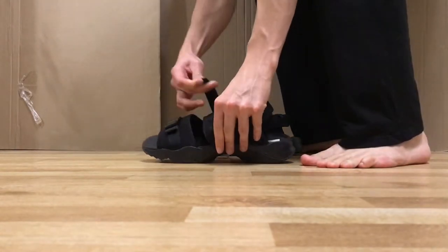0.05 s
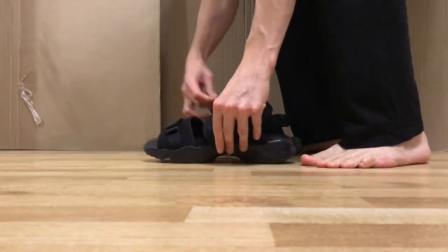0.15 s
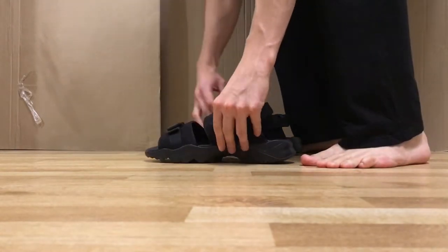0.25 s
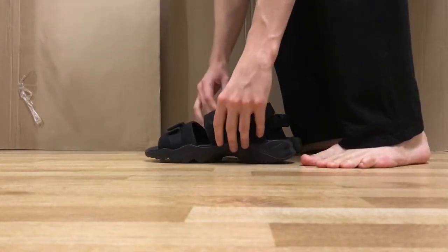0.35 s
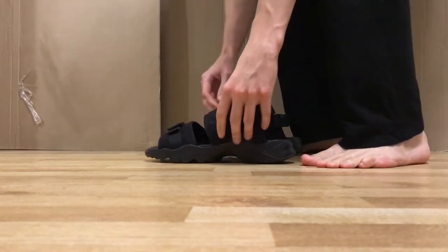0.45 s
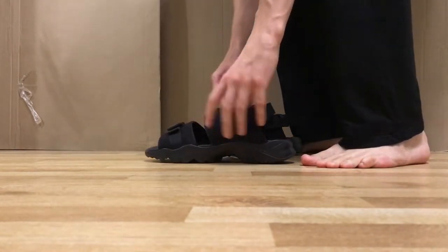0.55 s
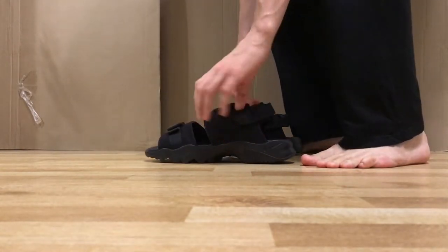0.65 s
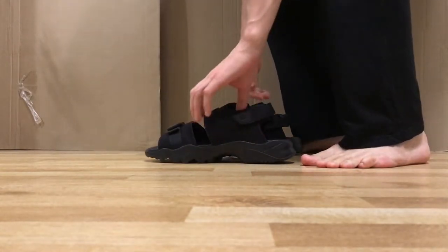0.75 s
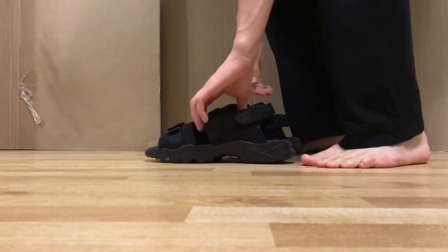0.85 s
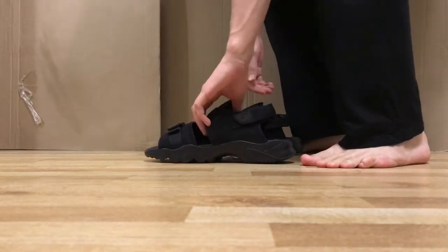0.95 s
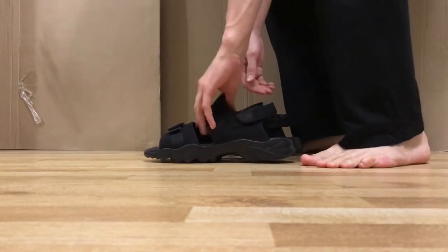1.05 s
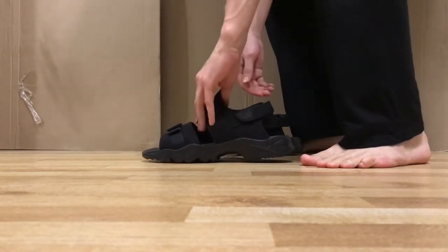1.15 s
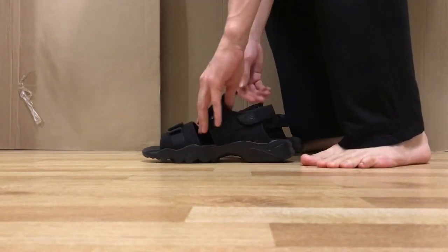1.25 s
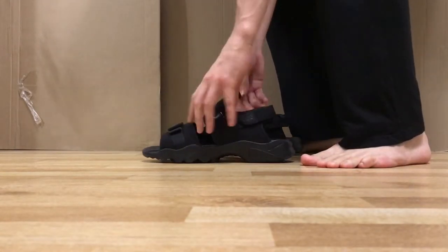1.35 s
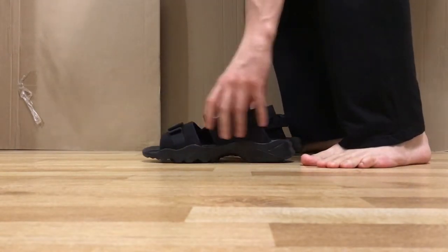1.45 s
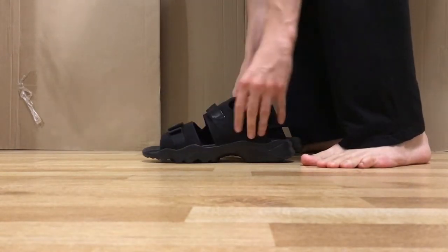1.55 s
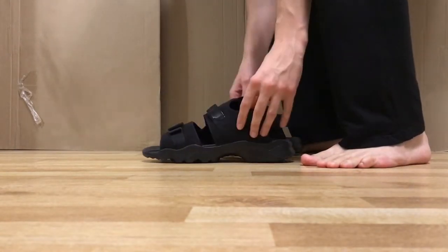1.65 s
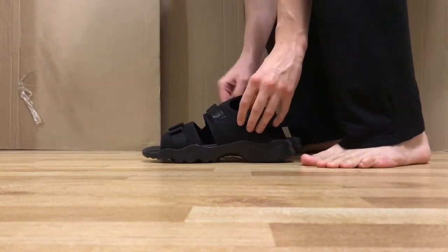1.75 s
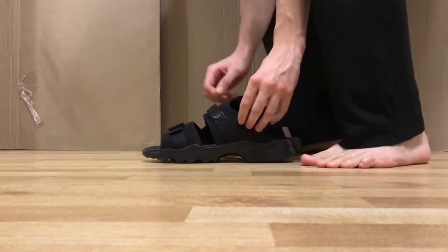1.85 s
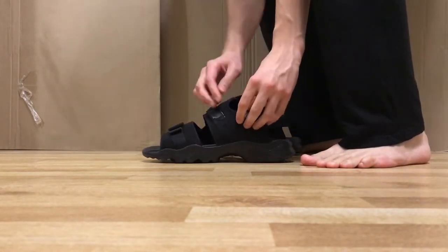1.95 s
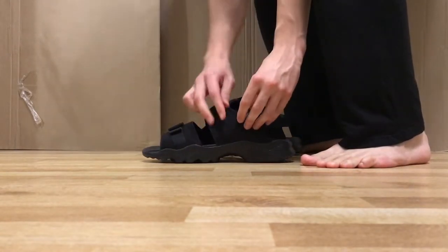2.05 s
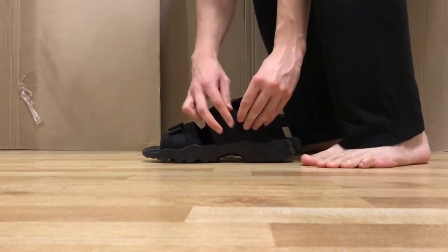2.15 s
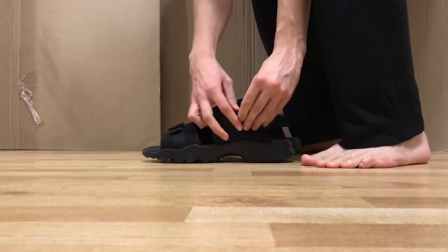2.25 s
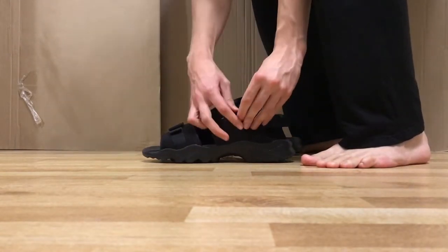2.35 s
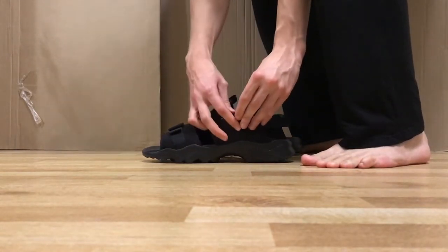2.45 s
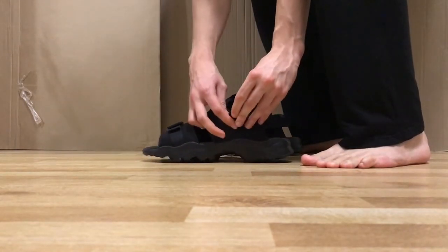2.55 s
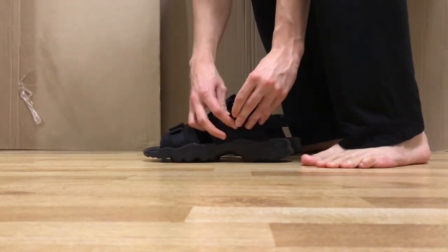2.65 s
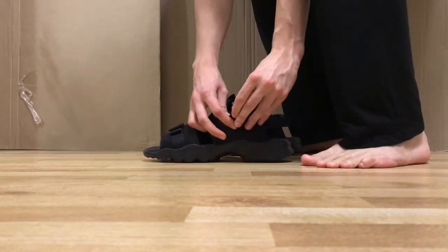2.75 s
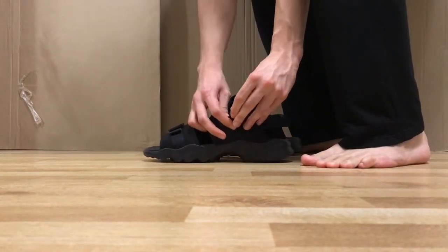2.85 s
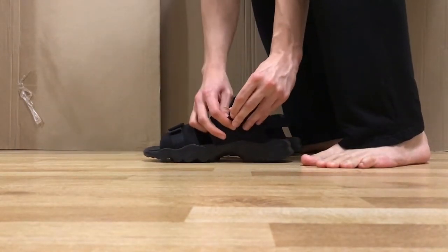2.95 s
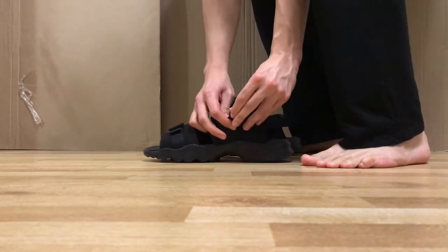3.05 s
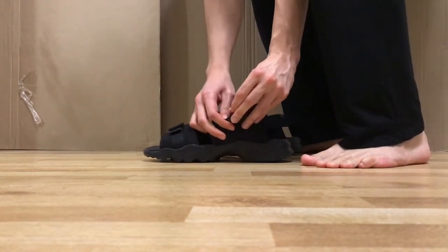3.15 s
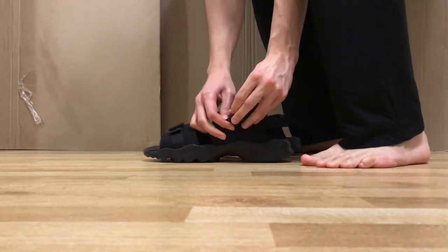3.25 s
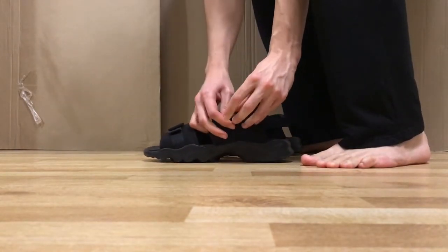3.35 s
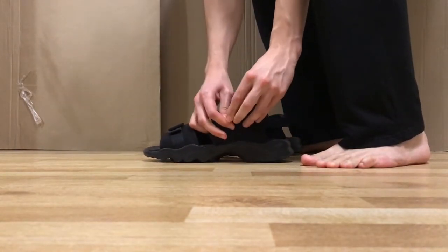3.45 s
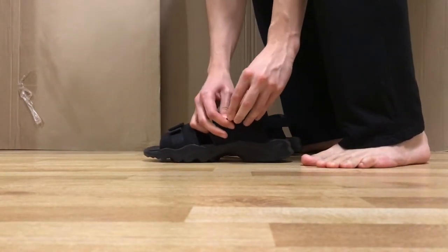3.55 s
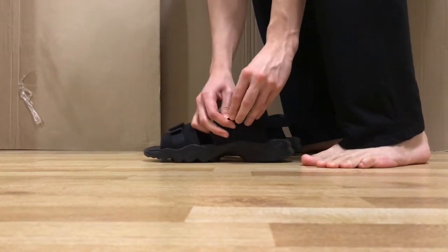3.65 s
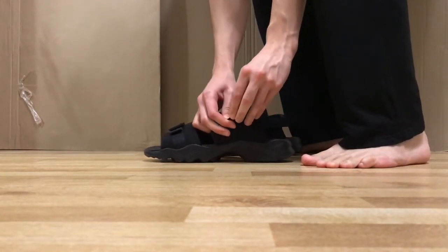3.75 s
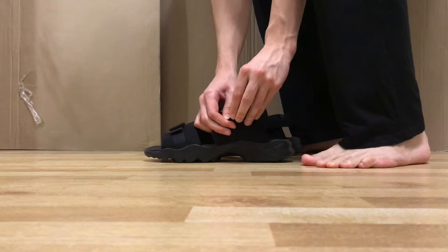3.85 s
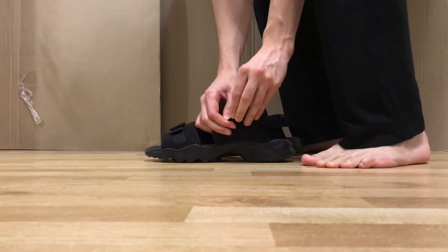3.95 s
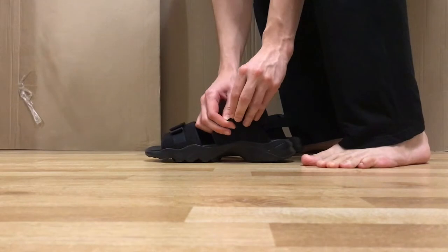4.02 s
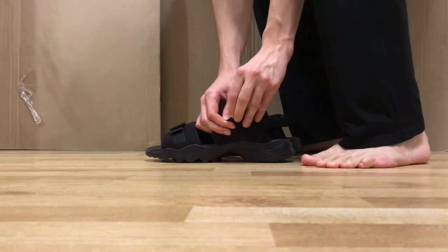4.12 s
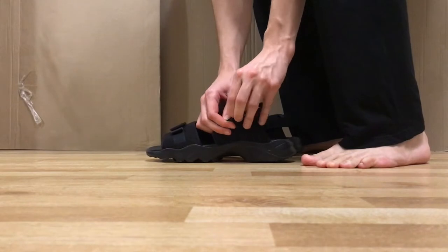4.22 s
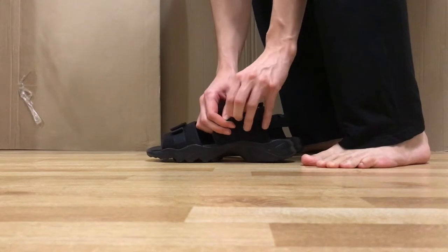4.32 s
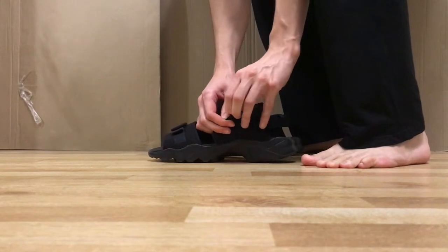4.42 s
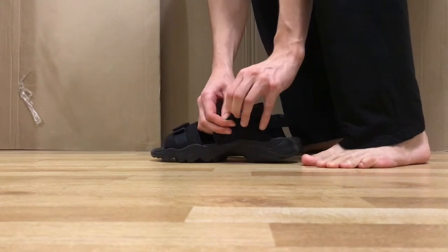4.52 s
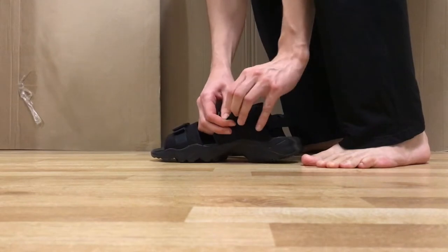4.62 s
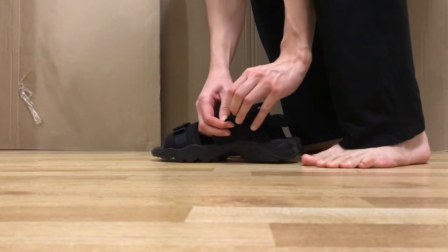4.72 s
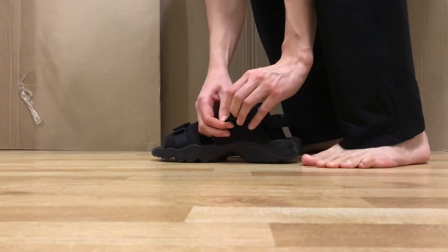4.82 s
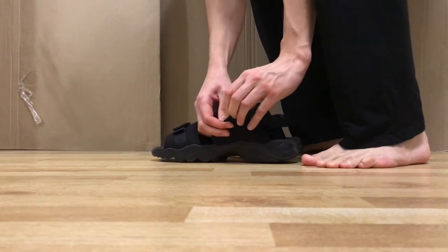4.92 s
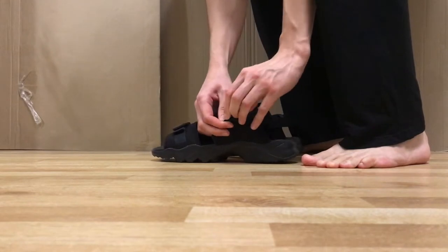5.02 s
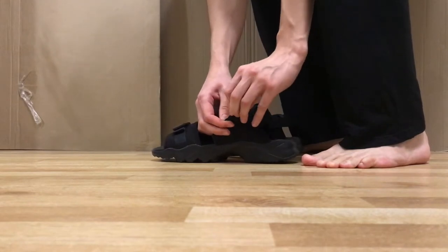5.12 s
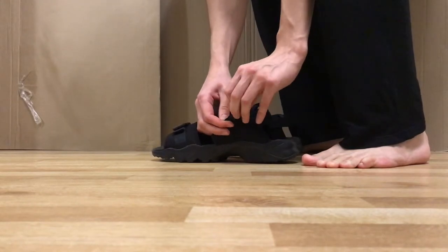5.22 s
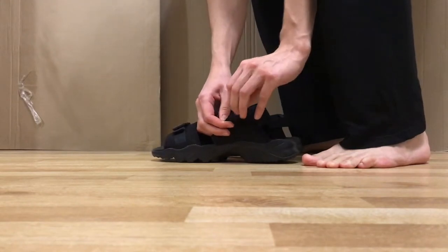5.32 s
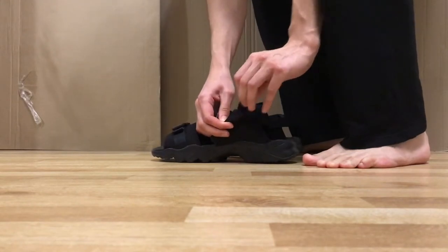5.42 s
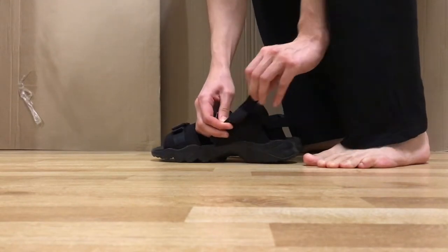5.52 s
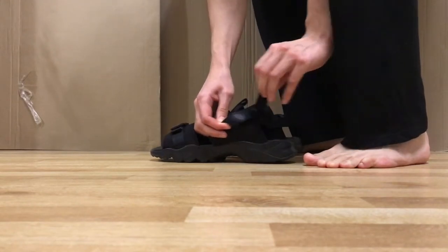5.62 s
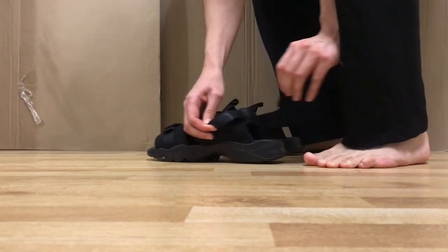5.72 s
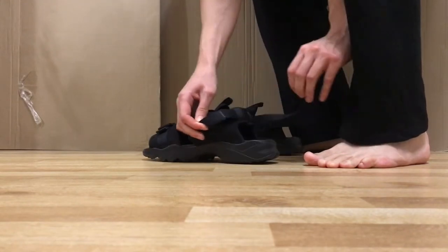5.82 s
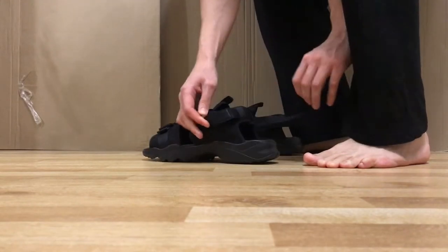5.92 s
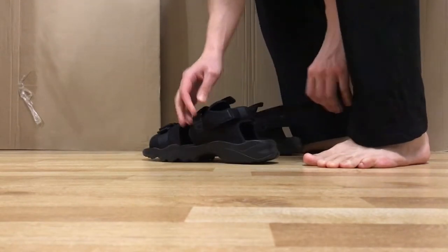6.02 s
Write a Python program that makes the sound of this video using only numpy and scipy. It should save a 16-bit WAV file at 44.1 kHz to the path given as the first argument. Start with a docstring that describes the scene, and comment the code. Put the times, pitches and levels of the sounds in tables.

```python
"""Hands work a sandal's hook-and-loop strap on a wooden floor in a small quiet room, over air and a faint hum.
From the start, filtered grains make fingers rub and brush the fabric; damped modes make nudges and knocks.
Small tufts of hooks snap as the tab is picked loose: whitened noise volleys through a short ring, plus recoil.
Later come three short tugs and the surges of the rip: runs of small snaps over a rasp of dense clicks;
a last rub and two faint knocks follow."""
import sys
import numpy as np
from scipy import signal
from scipy.fft import rfft, irfft
from scipy.io import wavfile

SR = 44100
rng = np.random.default_rng(int(sys.argv[2]) if len(sys.argv) > 2 else 0)


def generate_wav(signal):
    """Clip the signal to [-1, 1] and save it as 16-bit WAV at the path in sys.argv[1]."""
    frames = np.transpose(np.atleast_2d(signal))
    scaled = np.clip(frames, -1, 1) * 32767
    pcm = np.round(scaled).astype(np.int16)
    wavfile.write(sys.argv[1], SR, pcm)


N = 268128
TIME = np.arange(N) / SR   # seconds
CUTOFF_HZ = 15900   # top of the treble

# spectrum of the still room air: hz, relative level_db
AIR_SPECTRUM = [(15, -60), (25, -8.5), (80, 1.5), (175, -4), (317, -2), (451, -14.5), (575, -9.5),
                (734, -14), (1020, -12.5), (1700, -21), (4870, -27.5), (5730, -26.5), (7510, -31),
                (12500, -30), (16000, -36)]
AIR_DB = -59.5   # rms
# wavering hum lines: pitch_hz, rms level_db before the waver
HUM_LINES = [(102.3, -74.5), (258.4, -70.5), (317.6, -68)]
# strokes of the hands on the sandal, plus a short burst of rub and brush that thickens the snap at 3.17 s: #
# middle_s, length_s, soft rub_db, dry brush_db (both before the trims in scene)
HAND_STROKES = [(0, 0.11, -47, -51.5), (0.205, 0.076, -52.5, -62.5), (0.248, 0.016, -40.5, -47),
                (0.291, 0.007, -31, -41.5), (0.94, 0.25, -62, -86), (1.141, 0.11, -55, -70.5),
                (1.294, 0.057, -57, -62.5), (1.61, 0.16, -63, -73), (1.774, 0.07, -53, -60),
                (1.897, 0.062, -52.5, -62.5), (2.255, 0.03, -56, -68), (2.442, 0.16, -60.5, -67.5),
                (2.551, 0.027, -52, -58.5), (2.63, 0.086, -62, -86), (2.928, 0.029, -56.5, -85),
                (3.172, 0.0081, -36.5, -37), (3.943, 0.52, -75, -74),   (4.959, 0.026, -58.5, -66),
                (5.28, 0.045, -64, -66), (5.72, 0.54, -58, -67.5)]
# tone of skin rubbing on padding: hz, relative level_db
RUB_SPECTRUM = [(200, -14.5), (450, -8), (700, -1), (1050, 4), (1700, -9), (2800, -10.5), (5000, -27.5),
                (9000, -25), (16000, -53)]
# tone of webbing brushing on webbing: hz, relative level_db
BRUSH_SPECTRUM = [(800, -54.5), (2500, 10.5), (4000, 2.5), (7000, 1.5), (10000, -7.5), (13000, -6),
                  (16000, -13.5)]
# blows on the sandal: start_s, level_db, contact brightness_hz, sole thud_db relative to the blow,
# stiffness of the spot as a pitch ratio for the upper
SANDAL_KNOCKS = [(.241, -11.5, 1100, 1.5, 0.72), (0.2511, -15.5, 1280, -5.5, 0.82),
                 (0.2921, 0, 1460, -34, 0.93), (.364, -18, 700, -20, 1.1), (1.2543, -10.5, 603, -4.5, 1.15),
                 (1.304, -24, 604, 5, 1.06), (1.375, -29.5, 600, -2, 1.5), (1.5755, -25, 980, -4, 1.19),
                 (2.547, -20.5, 2160, -30, 1.45), (3.1712, -11, 4570, -20, 1.97),
                 (3.172, -13.5, 4000, -7.5, 1.17), (4.649, -20.5, 700, -19, 1.08),
                 (4.686, -13, 700, -15, 0.86), (5.1315, -19, 900, -11, 1.15), (5.484, -19, 880, -1.5, 1.13),
                 (5.876, -28, 1020, -2, 0.97), (6.028, -32.5, 700, -2, 1.3)]
# resonances of the sandal's upper and buckle, before each blow's scatter: pitch_hz, width_hz, level_db
UPPER_MODES = [(587, 275, -5.5), (868, 270, 3), (1610, 470, -1), (1940, 290, -8), (2850, 540, -2.5),
               (4200, 500, 2.5), (6360, 1200, -0.5)]
# resonances of the sole on the floor, before each blow's scatter: pitch_hz, width_hz, level_db
SOLE_MODES = [(69, 32, -23), (126, 47, 2), (181, 78, 0.5), (265, 40, 2.5), (340, 73, -1.5)]
# the clearest tufts of hooks letting go: start_s, level_db, tear_s (time the tuft takes to tear)
CLEAR_SNAPS = [(0.486, -36, .001), (0.7955, -38.5, 0.00088), (2.4181, -23.5, 0.00064), (2.8074, -39, .0007),
               (3.1355, -24.5, 0.00054), (3.152, -20, 0.00079), (3.1597, -22.5, 0.00046),
               (3.1706, -15.5, .0009), (3.9406, -22, 0.00025), (4.0869, -35.5, 0.00035),
               (4.1169, -11.5, 0.00037), (4.1649, -25, 0.00036), (4.1882, -22, 0.00028),
               (4.1928, -16, .0012), (4.2137, -21, 0.00045), (4.3131, -15, 0.00025),
               (4.3353, -17.5, 0.00018), (4.3723, -12, 0.00027), (4.4595, -13, 0.0014),
               (4.4759, -6.5, 0.0006), (4.5046, -12, 0.00074), (4.5861, -16.5, 0.00027),
               (4.5912, -9.5, 0.00029), (4.6135, -11, .0006), (4.6746, -2.5, 0.0015), (4.7135, -12, 0.0016),
               (5.1301, -12.5, 0.00043), (5.2986, -19, 0.00085), (5.3056, -6, 0.0013),
               (5.3177, -7.5, 0.00044), (5.3485, -0.5, 0.0017), (5.3933, -6.5, .0014),
               (5.4187, -2.5, .0014), (5.4223, 2.5, 0.0014), (5.4395, -1, 0.00036), (5.4628, 1.5, 0.00036),
               (5.4807, 3, 0.0016), (5.5217, -7, .0006), (5.5619, -6, 0.0012), (5.594, -17, .0003),
               (5.6213, -5.5, 0.0023)]
NEIGHBOUR_GAP_S, NEIGHBOUR_DB = 0.003, -9.5   # typical delay and relative level of a neighbour dragged loose
# the hooks ring higher the tauter the strap is held: time_s, ring_hz before scatter
STRAP_TAUTNESS = [(3.17, 2640), (4.2, 3900), (4.37, 4900), (4.5, 8750), (4.69, 9500), (4.75, 4200),
                  (5.13, 3720), (5.3, 10000), (5.355, 12000), (5.42, 6200), (5.463, 7400), (5.48, 4200)]
RING_SCATTER_OCTAVES = 0.18   # no two tufts ring alike
RECOIL_SHARE = 0.97   # share of a tuft's swing in dB that the strap's recoil follows
# tone of the hooks: hz, relative level_db
HOOK_SPECTRUM = [(300, -30.5), (900, -9), (1550, -7), (2100, -6), (3000, -2), (4700, -3), (6200, 0),
                 (8000, -3), (10500, -2.5), (13000, -5), (16000, -7.5)]
# tone of the strap body: hz, relative level_db
STRAP_SPECTRUM = [(150, -14.5), (280, -9.5), (420, -9.5), (650, 3), (1000, 5), (1550, -5.5), (2300, -17.5),
                  (6000, -74.5)]
# pulls that peel the strap, three short tugs and then the surges of the rip:
# start_s, length_s, rasp_db of single hooks, tuft_db before scatter
PEEL_PULLS = [(4.463, .024, -46.5, -15), (4.604, 0.023, -54, -15), (4.667, .057, -56, -13.5),
              (5.333, 0.052, -35.5, -9.5), (5.389, 0.033, -47, -13), (5.42, 0.048, -33, -5.5),
              (5.488, .053, -47, -17), (5.54, 0.0356, -38, -14.5), (5.577, .06, -45.5, -23)]
PULL_EDGE_S = 0.0023   # a pull takes hold and lets go this fast
TUFT_GAP_S = 0.007   # average spacing of the small tufts within a pull
TUFT_TEAR_S, TUFT_SCATTER_DB = 0.00044, 1   # typical tear time, and level spread either way
# length of the room's tail: hz, t60_s
ROOM_T60 = [(150, 0.54), (500, 0.4), (1400, 0.44), (4000, 0.45), (9000, 0.31), (15000, 0.41)]
# strength of the room's tail against the direct sound: hz, level_db
ROOM_LEVEL = [(100, 0.5), (400, -2), (1000, -7), (4000, -5.5), (9000, -8.5), (15000, -4.5)]
# first reflections: delay_s, level_db against the direct sound
FIRST_ECHOES = [(.0039, -12), (.0095, -15)]


def from_db(db):
    """Decibels to gain."""
    return 10 ** (np.asarray(db) / 20)


def rms_one(x):
    """Scale to rms 1."""
    return x / np.sqrt(np.mean(x ** 2) + 1e-20)


def energy_one(x):
    """Scale to total energy 1."""
    return x / np.sqrt(np.sum(x ** 2) + 1e-20)


def at_hz(points, hz):
    """Read a table on a log-frequency axis."""
    f, value = np.transpose(points)
    return np.interp(np.log(np.maximum(hz, 1)), np.log(f), value)


def add(track, s, sound):
    """Mix a sound in at time s."""
    start = max(round(s * SR), 0)
    track[start:start + len(sound)] += sound[:max(N - start, 0)]


def drift(rate):
    """Random wander through rate knots a second, each knot drawn with spread 1."""
    knots = rng.standard_normal(N // 20)
    return np.interp(TIME * rate, np.arange(len(knots)), knots)


def colour(x, spectrum, size=4096):
    """Causal (minimum-phase) filter of the given shape that keeps the power of white noise."""
    cepstrum = irfft(np.log(from_db(at_hz(spectrum, np.fft.rfftfreq(size, 1 / SR)))))
    # folding the cepstrum onto positive time makes the filter minimum-phase
    cepstrum[1:size // 2] *= 2
    cepstrum[size // 2 + 1:] = 0
    response = energy_one(irfft(np.exp(rfft(cepstrum))))
    return signal.fftconvolve(x, response)[:N]


def grains(per_s, spread_db):
    """Random clicks of random sign, sized by an exponential spread in dB; rms 1."""
    sizes = from_db(spread_db * np.minimum(rng.exponential(1, N), 4)) * rng.choice([-1, 1], N)
    return rms_one(sizes * (rng.random(N) < per_s / SR))


def background(waver):
    """Still room air, and a hum whose lines waver in level and phase."""
    air = from_db(AIR_DB) * rms_one(colour(rng.standard_normal(N), AIR_SPECTRUM))
    hum = np.zeros(N)
    for hz, db in HUM_LINES:
        swell = 1 + waver * drift(3.215)
        phase = 2 * np.pi * hz * TIME + 2 * waver * drift(7.5)
        hum += from_db(db) * np.sqrt(2) * swell * np.sin(phase)
    return air + hum


def handling(rub_db, brush_db):
    """Skin on padding gives a dull grainy rub, webbing on webbing a finer dry brush."""
    rub, brush = np.zeros(N), np.zeros(N)
    for middle, length, soft_db, dry_db in HAND_STROKES:
        pressure = np.exp(-(2 * (TIME - middle) / length) ** 2)
        rub += pressure * from_db(soft_db + rub_db)
        brush += pressure * from_db(dry_db + brush_db)
    rub_grains = colour(grains(500, spread_db=2), RUB_SPECTRUM)
    brush_grains = colour(grains(4000, spread_db=0.0), BRUSH_SPECTRUM)
    return rub * rub_grains + brush * brush_grains


def struck(modes, stiffness, scatter_db):
    """Damped modes, higher at a stiffer spot; each blow shares its energy among them a little differently."""
    t, out = TIME[:SR // 5], 0
    for k, (hz, width, db) in enumerate(modes):
        strength, detune = rng.standard_normal(2)
        mode_hz = hz * stiffness * (1 + 0.011 * detune)
        wave = np.sin(2 * np.pi * mode_hz * t) * np.exp(-np.pi * width * t)
        # neighbouring modes start in opposite directions
        out = out + (-1) ** k * from_db(db + scatter_db * strength) * energy_one(wave)
    return out


def knocks():
    """Soft contacts stir only the low modes of the upper; the sole passes the blow to the floor."""
    out = np.zeros(N)
    for s, db, bright_hz, thud_db, stiffness in SANDAL_KNOCKS:
        contact = signal.butter(2, min(bright_hz, .4 * SR), fs=SR, output="sos")
        upper = signal.sosfilt(contact, struck(UPPER_MODES, stiffness, scatter_db=-1.0))
        sole = struck(SOLE_MODES, 1.0, scatter_db=4.5)
        add(out, s, from_db(db) * energy_one(upper))
        add(out, s, from_db(db + thud_db) * energy_one(sole))
    return out


def whiten(x):
    """Keep the phases of a burst but give every frequency the same strength."""
    spectrum = rfft(x)
    return irfft(spectrum / (np.abs(spectrum) + 1e-12), len(x))


def tufts():
    """Clear snaps, their neighbours and an uneven run of small tufts in every pull: start_s, level_db, tear_s."""
    rows = list(CLEAR_SNAPS)
    for (s, db, _), gap in zip(CLEAR_SNAPS, rng.uniform(-1, 1, size=len(CLEAR_SNAPS))):
        rows.append((s + NEIGHBOUR_GAP_S * 2 ** gap, db + NEIGHBOUR_DB, TUFT_TEAR_S))
    for start, length, _, db in PEEL_PULLS:
        for k, (late, size, slow) in enumerate(rng.uniform(-1, 1, size=(12, 3))):
            after = TUFT_GAP_S * (k + .5 + .5 * late)
            if after < length:
                rows.append((start + after, db + TUFT_SCATTER_DB * size, TUFT_TEAR_S * 2 ** slow))
    return rows


def snaps(recoil_db, ring_width_hz, crack):
    """The hooks of a tuft break in a quick dying volley, ring briefly, and the freed strap springs back."""
    hooks, recoil, t = np.zeros(N), np.zeros(N), TIME[:SR // 40]
    r = np.exp(-np.pi * ring_width_hz / SR)   # pole radius of the ring
    chances = rng.standard_normal(size=(200, 2))
    breaks = rng.standard_normal(size=(200, len(t)))
    for (s, db, tear_s), (detune, swing), noise in zip(tufts(), chances, breaks):
        # the first hooks to go hand their load to the rest, so the volley swells before it dies
        age = t / tear_s
        volley = whiten(noise * np.sqrt(age) * np.exp(-age)) * np.exp(-(age / 4) ** 2)
        taut_hz = np.interp(s, *np.transpose(STRAP_TAUTNESS))
        ring_hz = min(taut_hz * 2 ** (RING_SCATTER_OCTAVES * detune), CUTOFF_HZ)
        feed = [(1 - r * r) / 2, 0, (r * r - 1) / 2]
        resonance = [1, -2 * r * np.cos(2 * np.pi * ring_hz / SR), r * r]
        ringing = signal.lfilter(feed, resonance, volley)
        add(hooks, s, from_db(db) * energy_one(ringing + crack * volley))
        # a one-sample kick of random direction
        add(recoil, s, from_db(RECOIL_SHARE * db + recoil_db) * np.sign([swing]))
    return colour(hooks, HOOK_SPECTRUM) + colour(recoil, STRAP_SPECTRUM)


def peeling(hooks_per_s, catch_db, strap_db):
    """Along the peel line single hooks give way in a dense stream, catching and slipping unevenly."""
    pull = np.zeros(N)
    for start, length, rasp_db, _ in PEEL_PULLS:
        from_edge = np.minimum(TIME - start, start + length - TIME)
        pull += from_db(rasp_db) * np.clip(from_edge / PULL_EDGE_S, 0, 1)
    catching = from_db(catch_db * drift(350))
    hooks = pull * rms_one(grains(hooks_per_s, spread_db=0.5) * catching)
    return colour(hooks, HOOK_SPECTRUM) + from_db(strap_db) * colour(hooks, STRAP_SPECTRUM)


def room(x):
    """Two near reflections, and a diffuse tail that swells quickly and dies at its own pace in each band."""
    t = TIME[:SR * 3 // 4]
    hz, white = np.fft.rfftfreq(2 * len(t), 1 / SR), rfft(rng.standard_normal(2 * len(t)))
    edges, response = np.geomspace(40, SR / 2, num=14), np.zeros(len(t))
    swell = 1 - np.exp(-t / .003)
    for low, high in zip(edges, edges[1:]):
        centre = np.sqrt(low * high)
        band = irfft(white * (hz >= low) * (hz < high))[:len(t)]
        fade = swell * from_db(-60 * t / at_hz(ROOM_T60, centre))
        response += from_db(at_hz(ROOM_LEVEL, centre)) * band * energy_one(fade)
    response[0] += 1   # direct sound
    for delay, db in FIRST_ECHOES:
        response[round(delay * SR)] += from_db(db)
    return signal.fftconvolve(x, response)[:N]


def scene():
    """Hands, sandal and strap sound in the room over its background."""
    strap = snaps(recoil_db=-13.5, ring_width_hz=3600, crack=1.0)
    strap = strap + peeling(hooks_per_s=1300, catch_db=3.0, strap_db=-5.5)
    sandal = knocks() + handling(rub_db=-1.0, brush_db=1.0)
    return (room(strap + sandal) + background(waver=0.47))[None, :]


def record(dry, top=0.69):
    """The microphone drops the deep bass and rounds the sharpest peaks; the treble is cut steeply."""
    thin = signal.sosfilt(signal.butter(6, 39, "high", fs=SR, output="sos"), dry)
    rounded = top * np.tanh(thin / top)
    return signal.sosfilt(signal.ellip(10, .2, 80, CUTOFF_HZ, fs=SR, output="sos"), rounded)


dry = scene()
out = record(dry)
generate_wav(out)
```